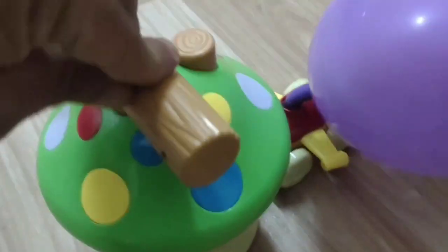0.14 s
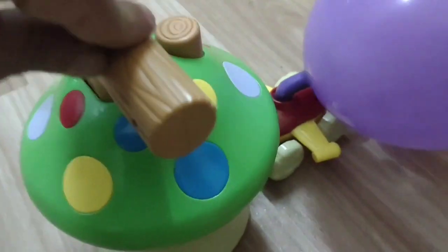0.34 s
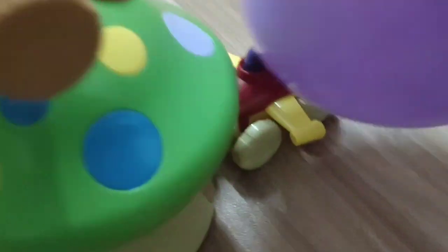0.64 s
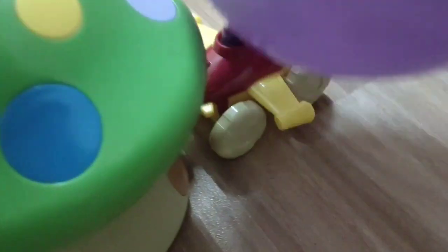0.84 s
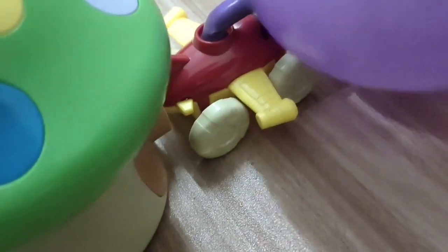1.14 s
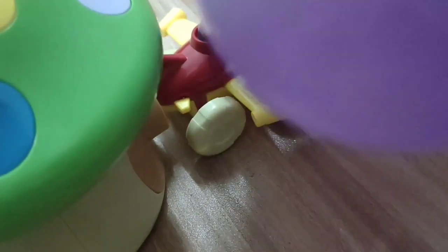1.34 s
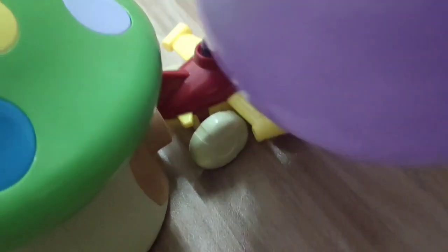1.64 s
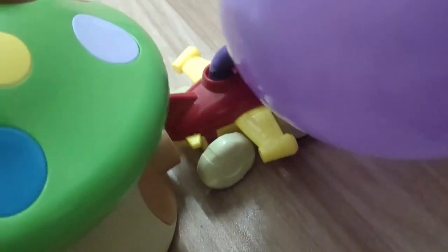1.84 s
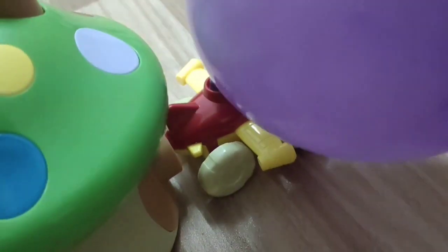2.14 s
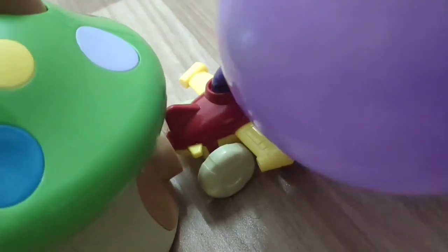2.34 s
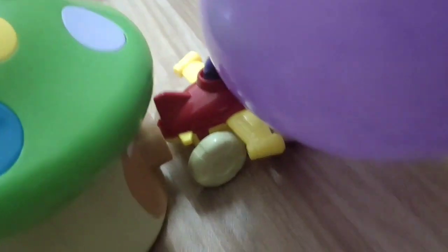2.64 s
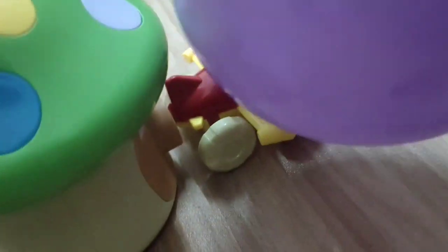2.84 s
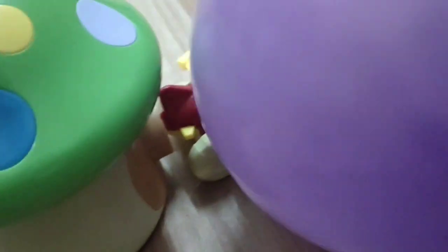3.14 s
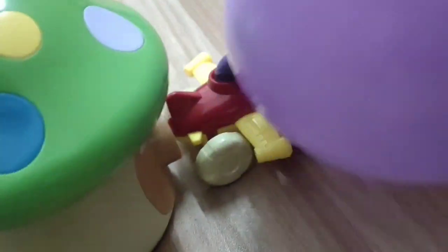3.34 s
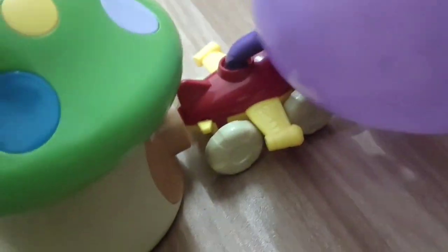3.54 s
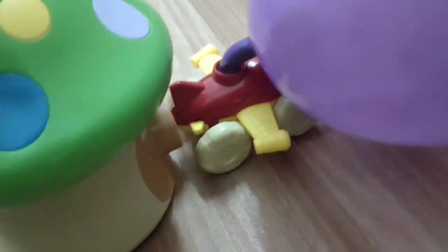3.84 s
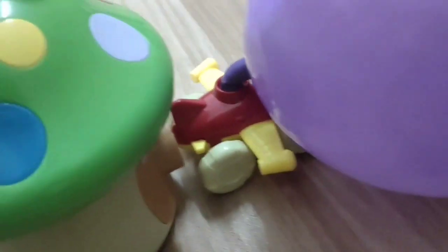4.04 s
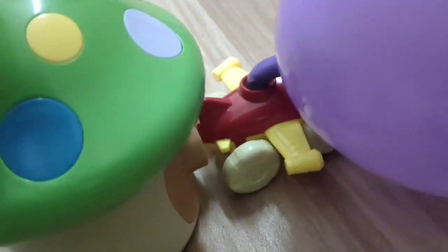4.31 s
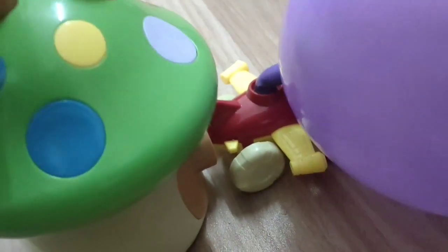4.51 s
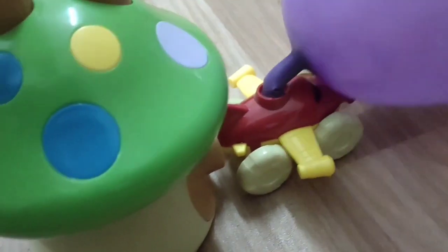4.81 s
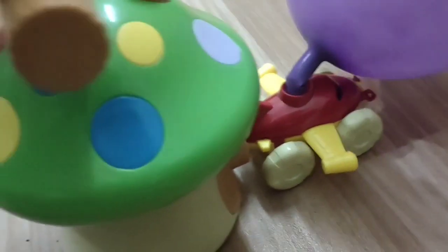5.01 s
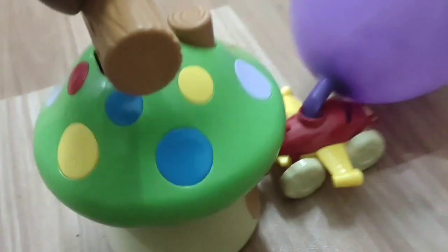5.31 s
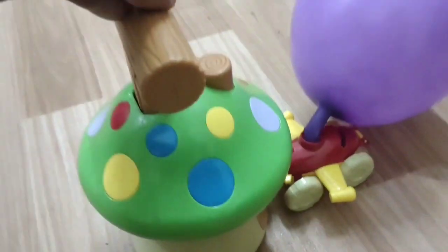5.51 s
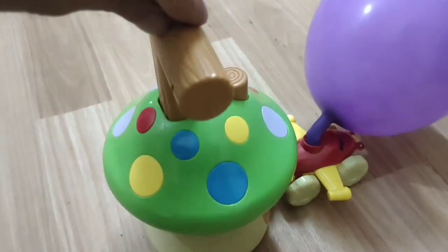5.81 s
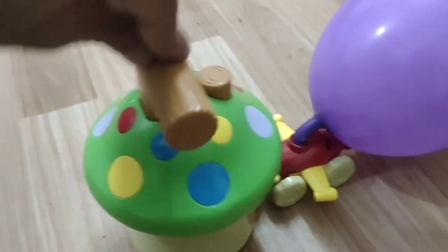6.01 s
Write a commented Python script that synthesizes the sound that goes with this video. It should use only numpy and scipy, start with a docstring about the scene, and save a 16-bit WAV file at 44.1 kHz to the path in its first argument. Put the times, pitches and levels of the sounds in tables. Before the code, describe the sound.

Close stereo sound of a small plastic toy pump filling a balloon on a wooden floor in a quiet, lightly reverberant room. At once there is a click and a brief, bright puff of air, ending near 0.2 s with a hollow plastic knock; small dull bumps trail to about 0.55 s, with a tiny tick at 0.6. Then mostly soft room air and faint low handling rumble, one faint tick at 1.9. At 2.8 s a sharp hissing puff begins a steady pumping rhythm, repeating at about 3.5, 4.2 and 4.9 s. Each lasts around 0.2 s, swelling quickly and stopping abruptly, with dry plastic ticks around it. Soft knocks sound near 4.65 and 5.03 s, then low faint bumps from 5.3 to 5.9 as handling rumble grows. A weaker puff starts at 6.1 s and is cut off at the end.

```python
"""A toy hand pump fills a balloon, heard close by on a wooden floor in a quiet room.
Each push drives turbulent hiss through the barrel and a ringing jet at a narrow valve, both shaped noise.
Short scrapes of noise make the plastic ticks; decaying sines with a dull knock make the housing bumps.
Underneath lie steady room air, a low rumble of hands on plastic and a faint throbbing band of hiss."""
import sys
import numpy as np
from scipy import signal
from scipy.fft import rfft, irfft, next_fast_len
from scipy.io import wavfile
from scipy.ndimage import uniform_filter1d

SR = 44100
rng = np.random.default_rng(int(sys.argv[2]) if len(sys.argv) > 2 else 0)


def store_pcm(level_fs):
    """Save levels as 16-bit WAV."""
    pcm = np.round(np.clip(level_fs, -1, 1) * 32767).astype(np.int16)
    wavfile.write(sys.argv[1], SR, np.atleast_2d(pcm).T)


N = 271656

# Pushes of the plunger. Each row: start in seconds, rise in seconds, length in seconds,
# level at full speed in dB before the hiss and jet trims, swell up to it in dB, sag after it in dB
# (negative grows), jet trim in dB, lift of the barrel resonance in dB, depth of the hollow in dB.
STROKES = [(0.016, 0.09, 0.15, -26.5, 7, -4, 8, 6, 0), (2.759, 0.098, 0.21, -25.5, 6.5, 7.5, 3.5, -1, 53),
           (3.475, 0.1, 0.16, -26, 22.5, -1.5, 6.5, 5, 40),
           (4.22, 0.12, 0.178, -23.5, 18.5, 3.5, 3.5, 1, 29), (4.945, 0.13, 0.2, -27.5, 16, 8, -1, 3, 2),
           (6.099, 0.08, .16, -34, 18, 0, -3, 6.5, 9)]
# Air rushing through the pump. Each row: frequency in Hz, relative density in dB per Hz.
HISS = [(150, -37), (600, -14.5), (1200, -12.5), (1900, -12), (2500, -3.5), (3200, -0.5), (3700, -2),
        (4500, -1), (5600, -3), (6800, 0), (8000, -1), (9300, -3.5), (11000, -3.5), (12000, -8),
        (13000, -8.5), (15500, -5)]
# Resonances of the jet at the valve. Each row: frequency in Hz, width in Hz, relative level in dB.
JET = [(6630, 180, -10), (9700, 250, -3), (10570, 500, -1), (11320, 330, -2), (13280, 920, 4.5),
       (13500, 400, -2), (14800, 450, -4), (14700, 400, -11)]
# Resonance of the barrel. Each row: frequency in Hz, width in Hz, weight in dB on the stroke's lift.
BARREL = [(2930, 1200, 0)]
# Ticks of plunger and valve. Each row: start in seconds, nominal peak in dB before panning,
# length of the scrape in seconds (it is loudest halfway).
TICKS = [(0.001, -29, 0.013), (0.609, -37.5, 0.0081), (1.931, -39.5, 0.003), (3.018, -30, 0.0035),
         (3.167, -42, 0.0093), (3.178, -32.5, 0.0096), (3.461, -29.5, 0.01), (3.922, -34, 0.0036),
         (3.931, -29, 0.008), (4.197, -35, 0.0018), (4.209, -33, 0.011), (4.539, -32, 0.0034),
         (4.627, -36.5, 0.014), (4.639, -31, 0.0068), (4.941, -30, 0.0075), (5.392, -30, 0.0044),
         (5.794, -39.5, 0.0055), (6.081, -43, 0.0087)]
# Colour of the ticks. Each row: frequency in Hz, relative density in dB per Hz.
TICK_COLOUR = [(500, -9), (1500, 10), (3500, 10), (6000, 8.5), (9000, 4), (15500, 4)]
# Knocks that ring the housing and its small parts. Each row: start in seconds, nominal peak in dB
# before rise and panning, pitch in Hz, time to decay 60 dB in seconds, left over right in dB.
BUMPS = [(0.009, -18.5, 537, 0.032, -2), (0.189, -12.5, 237, 0.031, -2), (0.221, -25, 194, 0.068, 0),
         (0.284, -29, 173, 0.07, -20.5), (0.283, -38, 75, 0.082, -22), (0.327, -38, 106, 0.14, -23),
         (0.378, -24.5, 554, 0.043, -5), (0.391, -35.5, 3730, 0.019, 15), (0.551, -37, 3640, 0.025, 14),
         (4.655, -26, 255, 0.055, -5), (5.032, -19.5, 252, 0.042, -5), (5.276, -34, 208, 0.19, -2),
         (5.335, -29.5, 208, 0.099, -3), (5.346, -37, 77.5, 0.13, -17), (5.487, -37, 81, 0.12, -13),
         (5.685, -38, 77, 0.15, -10), (5.898, -36.5, 141, 0.12, -26), (5.935, -36, 102, 0.11, -17)]
# Room air heard near the floor. Each row: frequency in Hz, relative density in dB per Hz.
AIR_BELOW = [(25, -47), (48, -23), (66, -9.5), (88, -13), (135, -10.5), (165, -1), (220, -2), (280, -2.5),
             (380, -3.5), (480, -6), (800, -11), (1130, -7.5), (1550, -16.5), (2400, -18.5), (3600, -30),
             (5500, -35.5), (9000, -38), (15500, -38)]
# Resonances in the air near the floor. Each row: frequency in Hz, width in Hz, relative level in dB.
AIR_PEAKS = [(106.5, 4.5, 4), (222, 10.7, 2.4), (308.6, 5.3, 0.66)]
# Room air heard from higher up. Each row: frequency in Hz, relative density in dB per Hz.
AIR_ABOVE = [(25, -42), (48, -18), (75, -8.5), (130, -4), (205, 0.5), (330, -8), (385, -3), (430, -2),
             (500, 2), (620, -5), (800, -5.5), (950, -10), (1200, -9), (1550, -13.5), (2400, -17.5),
             (3600, -26.5), (5500, -35), (9000, -35.5), (15500, -37)]
# Stereo width of the room air. Each row: frequency in Hz, left-right likeness from -1 to 1.
AIR_LIKENESS = [(60, 1), (130, 0.99), (290, 0.88), (640, 0.65), (1410, 0.05), (3100, -0.024), (6820, 0.1),
                (15000, -0.13)]
# Microphone height. Each row: time in seconds, height from 0 near the floor to 1 above the pump.
HEIGHT = [(0, 0.96), (0.4, 1), (0.75, 0.62), (1.05, 0.025), (4.8, 0.027), (5.3, 0.4), (5.75, 0.99),
          (6.16, 0.74)]
# Hands shifting on the plastic. Each row: time in seconds, rumble level in dB before panning.
HANDLING = [(0, -58), (0.35, -56), (0.7, -54), (1.0, -64), (2.0, -68.5), (2.9, -60), (3.3, -62), (4.6, -67),
            (5.0, -54.5), (6.16, -48)]
# Colour of that rumble. Each row: frequency in Hz, relative density in dB per Hz.
RUMBLE = [(25, -42), (50, -16), (75, 11.5), (120, -1), (190, -11), (330, -32), (1500, -62)]
# Faint throbbing band of hiss. Each row: frequency in Hz, width in Hz, relative level in dB.
THROB_BAND = [(6890, 420, 0)]
# Reverberation of the room. Each row: frequency in Hz, time to decay 60 dB in seconds.
ROOM_DECAY = [(200, 0.45), (3000, 0.4), (7000, 0.37), (13000, 0.38), (16000, 0.56)]

AIR_BELOW_DB, AIR_ABOVE_DB = -40.5, -41
THROB_BAND_DB, THROB_HZ, THROB_DEPTH = -62.5, 10.8, 0.35
SLIP_SPREAD = 0.3  # unevenness of the slips in a tick, in natural-log gain
SWELL_POWER = 2.03  # the plunger gains most of its speed early in the push
OPEN_S, SHUT_DB_PER_S = 0.012, 660  # the valve snaps open; flow collapses when the plunger stops
RELEASE_S = 0.019  # the last of the air escapes after the plunger stops
JET_BEST, JET_FALL_DB = 0.48, 8.5  # the jet rings most at this share of the push, this much less at its end
HOLLOW_HZ, HOLLOW_WIDTH_HZ = 3983, 180  # a narrow hollow, on both sides
LEFT_LAG_S = 0.000075  # the sound reaches the left microphone later
EDGE_HZ = 15650  # top of the final band


def gain_of(db):
    """Turns decibels into amplitude."""
    return 10 ** (np.asarray(db) / 20)


def evened(x):
    """Scales to an rms of 1."""
    return x / np.sqrt(np.mean(x ** 2) + 1e-20)


def read(points, hz):
    """Reads a table of frequency and value along a log-frequency axis."""
    f, value = np.transpose(points)
    return np.interp(np.log(hz + 1), np.log(f + 1), value)


def add(mix, s, sound):
    """Lays a stereo sound into the mix at time s."""
    part = mix[:, max(round(s * SR), 0):][:, :sound.shape[1]]
    part += sound[:, :part.shape[1]]


def panned(db):
    """Gives left and right gains for a left-over-right difference."""
    return gain_of([[db / 2], [-db / 2]])


def bells(peaks, hz):
    """Sums steep-sided resonances by power and returns their gain."""
    power = 0
    for f, width, db in peaks:
        gain = gain_of(db) / (1 + ((hz - f) / (0.75 * width)) ** 2)
        power = power + gain ** 2
    return np.sqrt(power)


def noise(gain, size, likeness):
    """Shapes stereo noise to a spectrum, sharing part of the left signal with the right."""
    left, other = rfft(rng.standard_normal((2, size)))
    likeness = np.clip(likeness, -1, 1)
    right = likeness * left + np.sqrt(1 - likeness ** 2) * other
    return evened(irfft(np.array([left, right]) * gain, size))


def swirl(x, patch_db, size, count):
    """Lets patches of the spectrum swell and fade, smoothed over count steps of size / 4 samples."""
    overlap = size - size // 4
    z = signal.stft(x, nperseg=size, noverlap=overlap)[2]
    patches = rng.standard_normal(z.shape[1:])
    for axis, span in ((0, 3), (0, 3), (1, count), (1, count)):  # frequency twice, then time twice
        patches = uniform_filter1d(patches, span, axis)
    z = z * gain_of(patch_db * evened(patches))
    return evened(signal.istft(z, nperseg=size, noverlap=overlap)[1][:, :x.shape[1]])


def background(below_pan_db=0.75, above_pan_db=0.5, rumble_pan_db=-6, waver_db=1.56):
    """Crossfades two colours of room air as the microphone sinks and rises; hands rumble on the plastic."""
    size = next_fast_len(N, True)
    hz, t = np.fft.rfftfreq(size, 1 / SR), np.arange(N) / SR
    likeness = read(AIR_LIKENESS, hz)
    below_colour = np.hypot(gain_of(read(AIR_BELOW, hz)), bells(AIR_PEAKS, hz))
    below = noise(below_colour, size, likeness)[:, :N]
    above = noise(gain_of(read(AIR_ABOVE, hz)), size, likeness)[:, :N]
    below = gain_of(AIR_BELOW_DB) * swirl(below, waver_db, size=2048, count=5) * panned(below_pan_db)
    above = gain_of(AIR_ABOVE_DB) * swirl(above, waver_db, size=2048, count=5) * panned(above_pan_db)
    height = np.clip(np.interp(t, *np.transpose(HEIGHT)), 0, 1)
    air = np.sqrt(1 - height) * below + np.sqrt(height) * above
    rumble = noise(gain_of(read(RUMBLE, hz)), size, 0.52)[:, :N]
    grip = gain_of(np.interp(t, *np.transpose(HANDLING)))
    return air + grip * rumble * panned(rumble_pan_db)


def throbbing_band():
    """A thin, faint band of hiss in the background, throbbing at an even rate."""
    size = next_fast_len(N, True)
    band = noise(bells(THROB_BAND, np.fft.rfftfreq(size, 1 / SR)), size, 0)[:, :N]
    throb = 1 + THROB_DEPTH * np.sin(2 * np.pi * THROB_HZ * np.arange(N) / SR)
    return gain_of(THROB_BAND_DB) * band * throb


def tick(s, db, length, crest_db=7.5, pan_db=2.0):
    """A few milliseconds of plastic catching and slipping on plastic."""
    size = 2048
    u = np.arange(size) / SR / (max(length, 1e-3) / 2)
    colour = gain_of(read(TICK_COLOUR, np.fft.rfftfreq(size, 1 / SR)))
    scrape = noise(colour, size, 0.041)
    slips = np.exp(SLIP_SPREAD * evened(uniform_filter1d(rng.standard_normal(size), size=30)))
    envelope = u * np.exp(1 - u)  # reaches 1 at half the length
    return s, gain_of(db - crest_db) * envelope * evened(slips * scrape) * panned(pan_db)


def bump(s, db, hz, t60, pan_db, knock_db=-16, knock_hz=900, knock_s=0.012, rise_s=0.0062):
    """A soft push rings the hollow plastic as a decaying sine, with a dull knock at the start."""
    size = 2 ** 13
    t = np.arange(size) / SR
    ring = np.sin(2 * np.pi * hz * t) * gain_of(-60 * t / t60)
    dull = 1 / (1 + (np.fft.rfftfreq(size, 1 / SR) / knock_hz) ** 2)
    knock = noise(dull, size, 0.86) * np.exp(-t / knock_s)
    soft_start = 1 - np.exp(-t / rise_s)
    return s, gain_of(db) * soft_start * (ring + gain_of(knock_db) * knock) * panned(pan_db)


def push(t, rise, length, peak_db, swell_db, sag_db):
    """Flow level in dB: swells as the plunger speeds up, drifts against the balloon, then shuts off."""
    gathering = np.maximum(1 - t / rise, 0) ** SWELL_POWER
    tiring = np.clip((t - rise) / (length - rise), 0, 1)
    shutting = np.maximum(t - length, 0)
    return peak_db - swell_db * gathering - sag_db * tiring - SHUT_DB_PER_S * shutting


def near_surfaces(x, echo=0.27, shortest_s=0.000488, longest_s=0.003, drift_s_per_s=0.00041):
    """Quick echoes off floor, housing and swaying balloon slide a ripple through each side's spectrum."""
    hz, t, z = signal.stft(x, SR, nperseg=512, noverlap=384)
    delay = rng.uniform(shortest_s, longest_s, size=(5, 2, 1, 1))  # five echoes on two sides
    delay = delay + drift_s_per_s * rng.standard_normal((5, 1, 1, 1)) * t
    echoes = np.exp(-2j * np.pi * hz[:, None] * delay).sum(0)
    z = z * abs(1 + echo * echoes)
    return evened(signal.istft(z, SR, nperseg=512, noverlap=384)[1][:, :x.shape[1]])


def stroke(start, rise, length, peak_db, swell_db, sag_db, bright_db, barrel_db, hollow_db,
           hiss_db=4.0, jet_db=1.0, jet_pan_db=17, hiss_pan_db=1.5, flutter_db=-0.23,
           eddy_db=3.5, likeness=0.36):
    """One push: turbulent hiss through the barrel, and a ringing jet that beams at the left microphone."""
    t = np.arange(0, length + RELEASE_S, 1 / SR)
    size = 2 ** 14
    hz = np.fft.rfftfreq(size, 1 / SR)
    right = np.arange(2)[:, None]  # 0 for left, 1 for right
    dip_db = hollow_db * np.exp(-((hz - HOLLOW_HZ) / HOLLOW_WIDTH_HZ) ** 2)
    path = gain_of(-dip_db) * np.exp(2j * np.pi * hz * LEFT_LAG_S * right)
    body = gain_of(read(HISS, hz) + barrel_db * bells(BARREL, hz))
    hiss = near_surfaces(noise(body * path, size, likeness))
    jet = near_surfaces(noise(bells(JET, hz) * path, size, likeness))
    # eddies shift the colour of both within the stroke
    hiss = swirl(hiss, eddy_db, size=256, count=14)[:, :len(t)] * panned(hiss_pan_db)
    jet = swirl(jet, eddy_db, size=256, count=14)[:, :len(t)] * evened(panned(jet_pan_db))
    # the flow flutters as the seal slides along the barrel
    flutter = evened(uniform_filter1d(rng.standard_normal(size), size=120))[:len(t)]
    flow_db = push(t, rise, length, peak_db, swell_db, sag_db) + flutter_db * flutter
    flow = gain_of(flow_db) * np.minimum(t / OPEN_S, 1)
    ringing_db = bright_db - JET_FALL_DB * ((t / length - JET_BEST) / (1 - JET_BEST)) ** 2
    return start, flow * gain_of(hiss_db) * hiss, flow * gain_of(jet_db + ringing_db) * jet


def room(x, dull_hz=19000):
    """Sparse taps of random sign; the walls return less treble, and decay time varies with pitch."""
    taps = np.zeros((2, SR))
    at = np.arange(200, SR - 20, 20)
    at = at + rng.integers(0, 20, (2, len(at)))
    np.put_along_axis(taps, at, rng.choice([-1., 1.], at.shape), 1)
    hz, t, z = signal.stft(taps, SR, nperseg=256)
    walls = 1 / (1 + (hz[:, None] / dull_hz) ** 4)
    decay = gain_of(-60 * t / read(ROOM_DECAY, hz)[:, None])
    tail = signal.istft(z * walls * decay, SR, nperseg=256)[1]
    return signal.fftconvolve(x, tail / np.linalg.norm(tail[0]), axes=1)[:, :N]


def scene(room_db=-11.5, spread=0.27, jet_room_db=-4):
    """Strokes, ticks and bumps over the background; the narrow jet feeds the room less than the rest."""
    pump, beam = np.zeros((2, 2, N))
    for row in STROKES:
        s, hiss, jet = stroke(*row)
        add(pump, s, hiss)
        add(beam, s, jet)
    for row in TICKS:
        add(pump, *tick(*row))
    for row in BUMPS:
        add(pump, *bump(*row))
    scattered = pump + gain_of(jet_room_db) * beam
    crossed = scattered + spread * scattered[::-1]  # some of each side reaches the other
    return pump + beam + gain_of(room_db) * room(crossed) + background() + throbbing_band()


def record(dry):
    """Limits the band with a steep low-pass filter."""
    low_pass = signal.firwin(401, EDGE_HZ, window=("kaiser", 9), fs=SR)
    return signal.oaconvolve(dry, low_pass[None], "same")


dry = scene()
out = record(dry)
store_pcm(out)
```